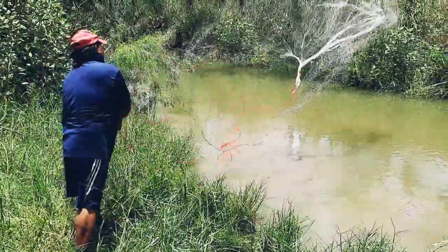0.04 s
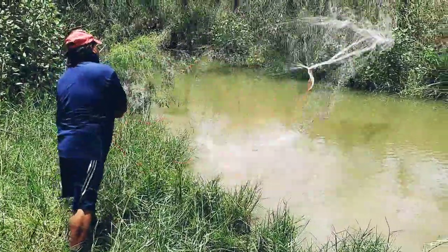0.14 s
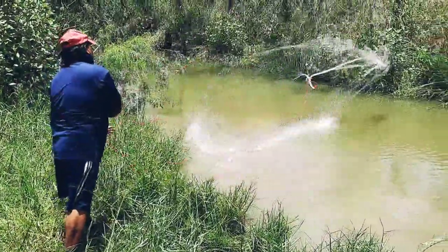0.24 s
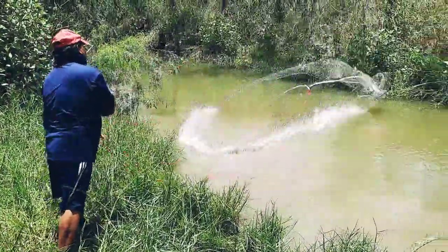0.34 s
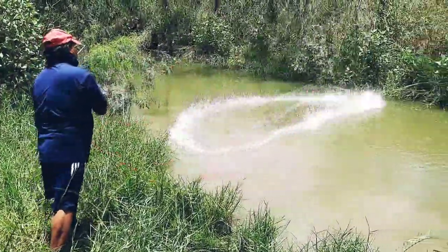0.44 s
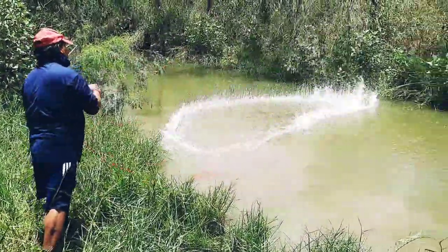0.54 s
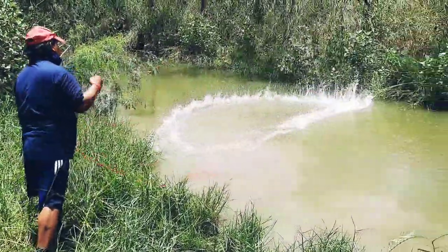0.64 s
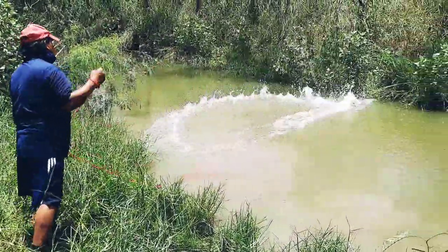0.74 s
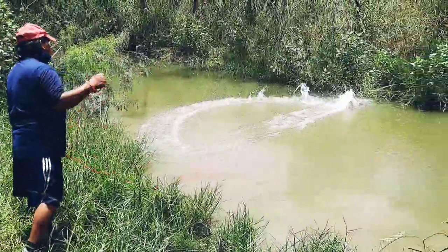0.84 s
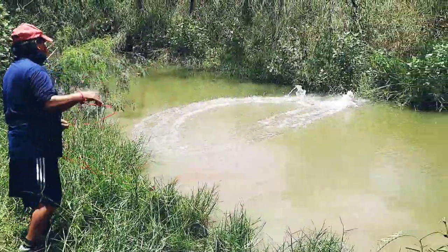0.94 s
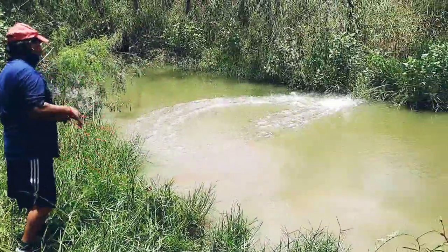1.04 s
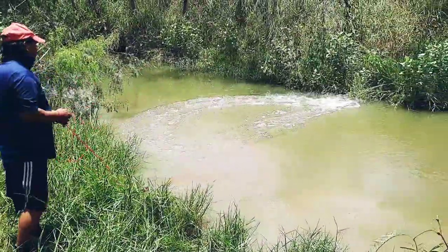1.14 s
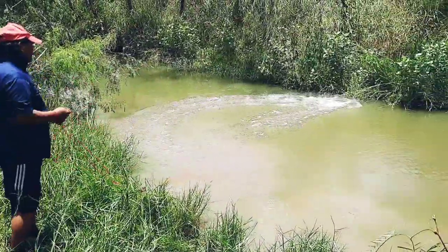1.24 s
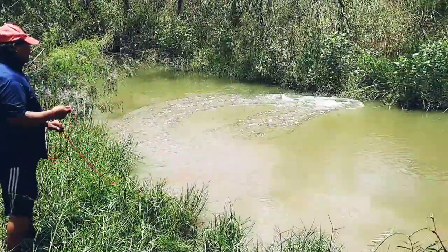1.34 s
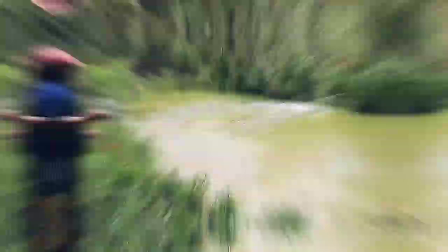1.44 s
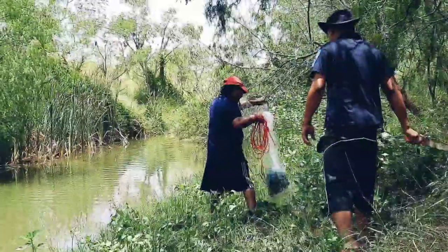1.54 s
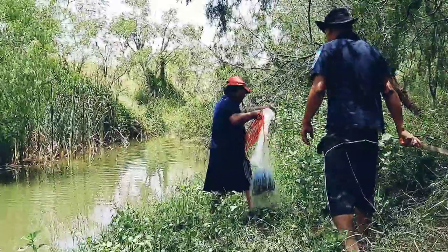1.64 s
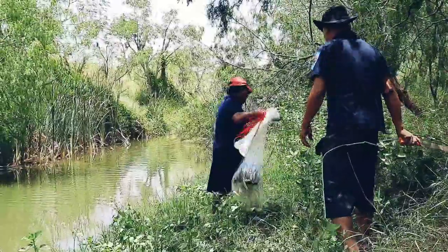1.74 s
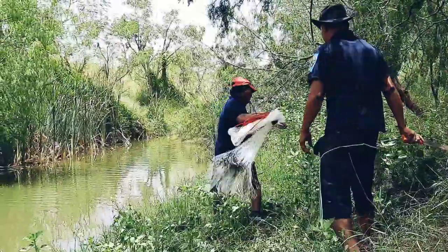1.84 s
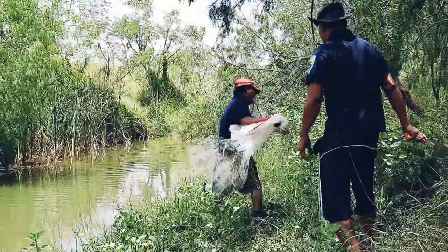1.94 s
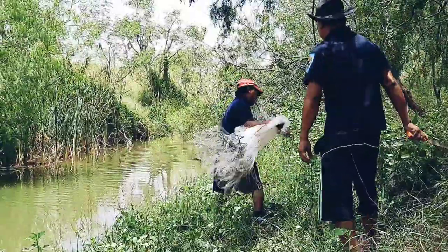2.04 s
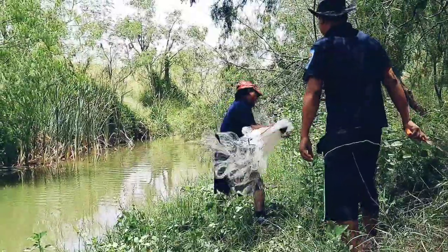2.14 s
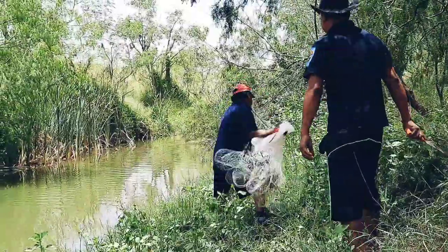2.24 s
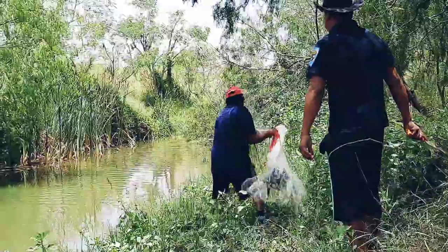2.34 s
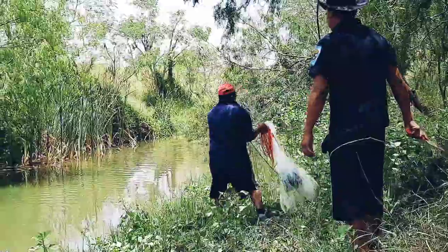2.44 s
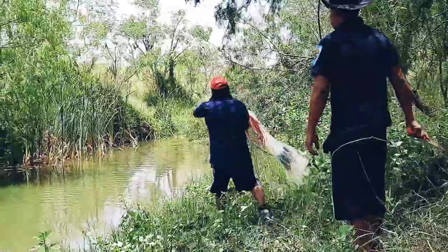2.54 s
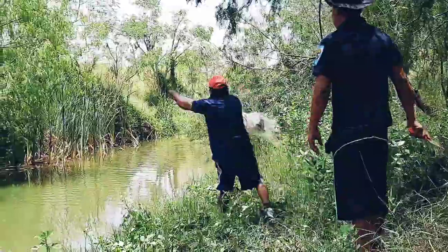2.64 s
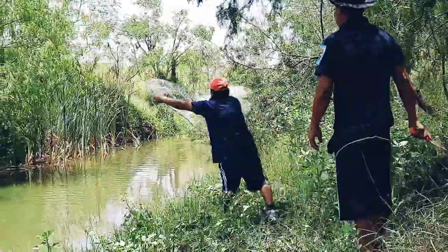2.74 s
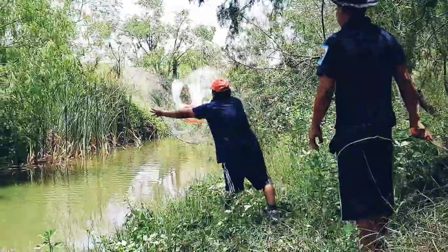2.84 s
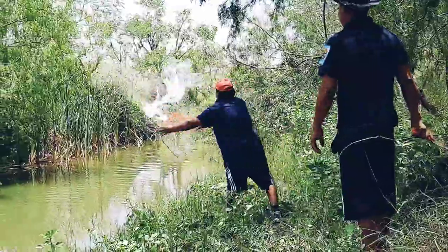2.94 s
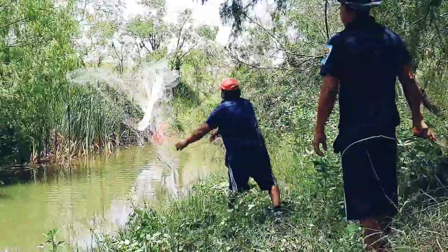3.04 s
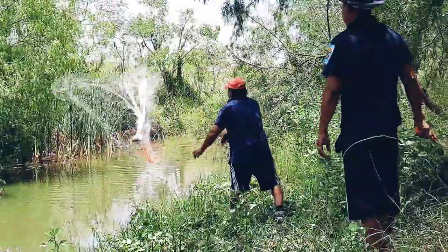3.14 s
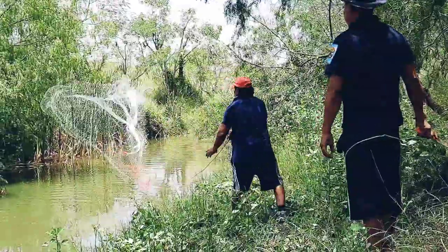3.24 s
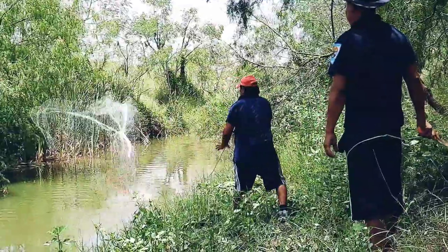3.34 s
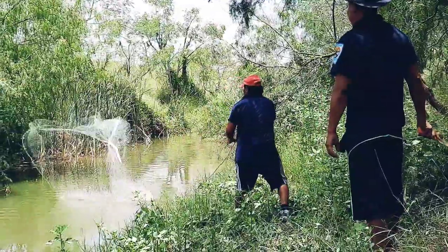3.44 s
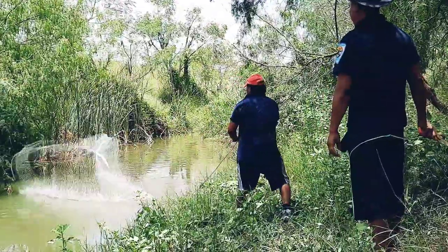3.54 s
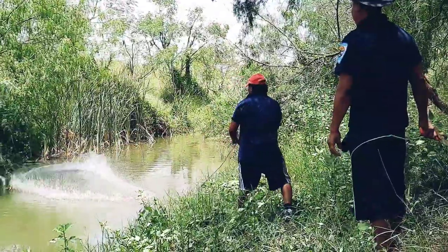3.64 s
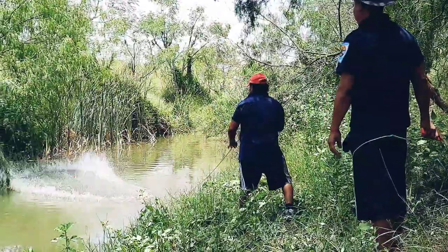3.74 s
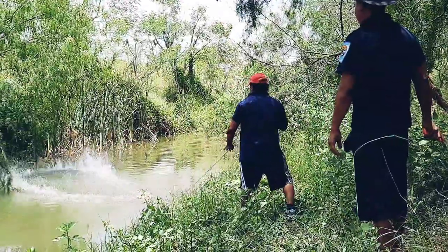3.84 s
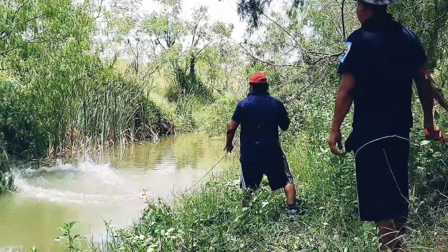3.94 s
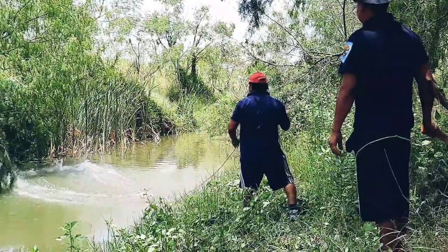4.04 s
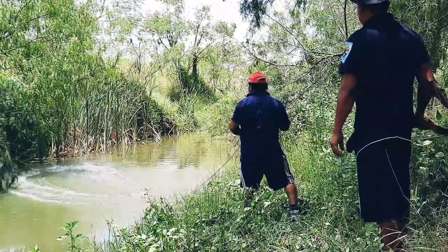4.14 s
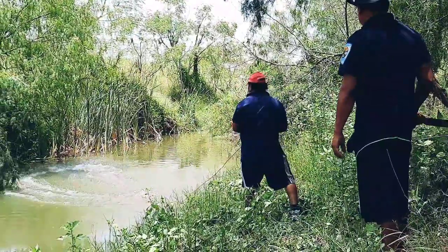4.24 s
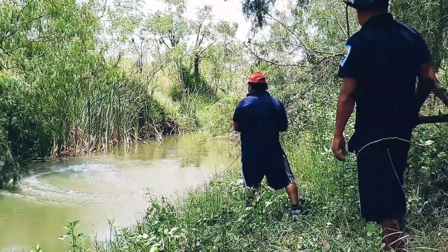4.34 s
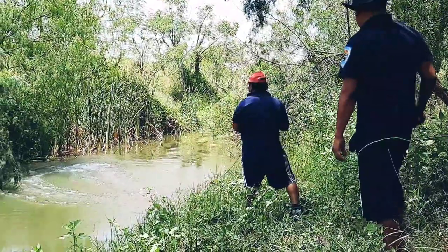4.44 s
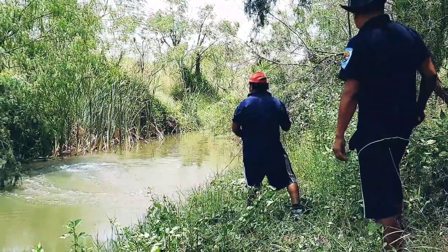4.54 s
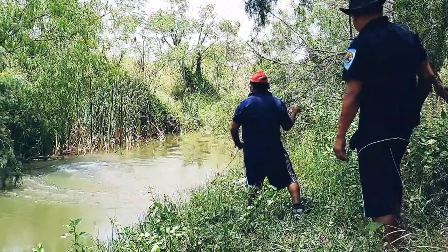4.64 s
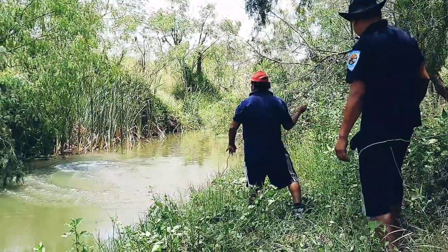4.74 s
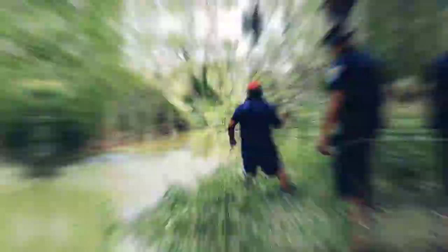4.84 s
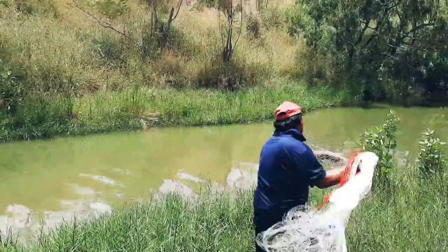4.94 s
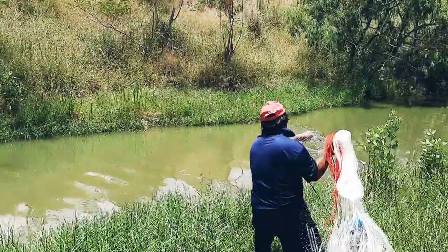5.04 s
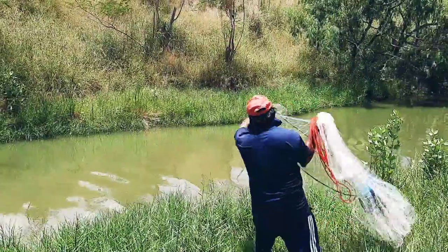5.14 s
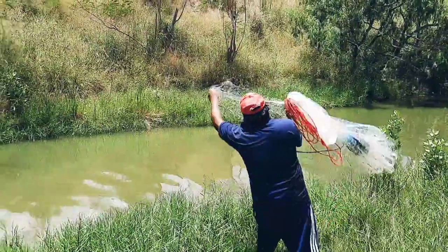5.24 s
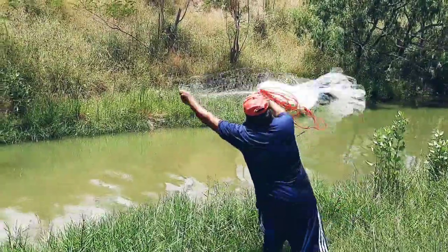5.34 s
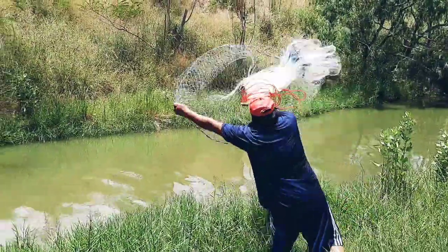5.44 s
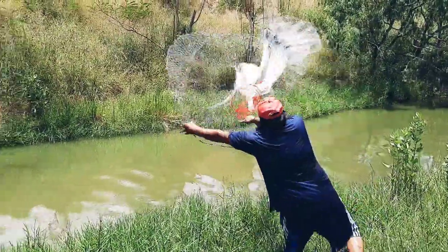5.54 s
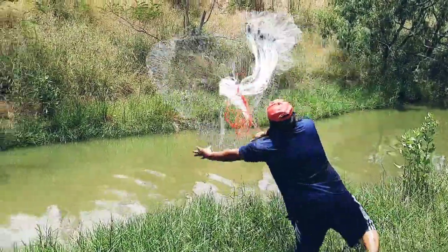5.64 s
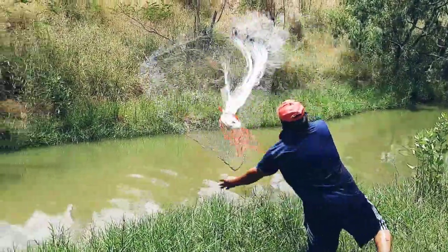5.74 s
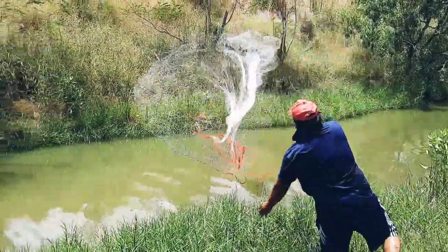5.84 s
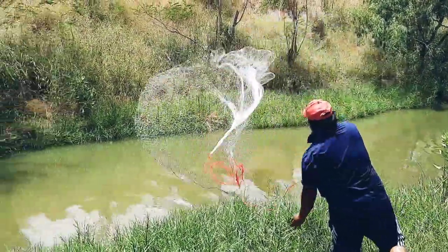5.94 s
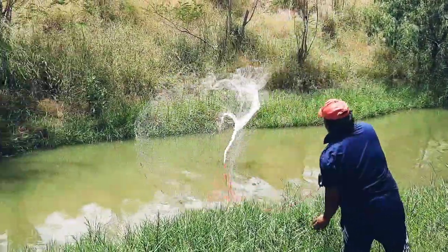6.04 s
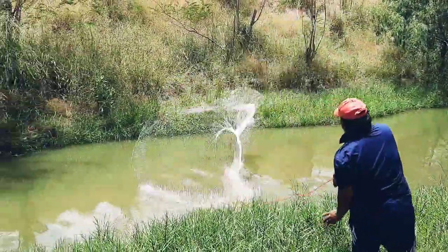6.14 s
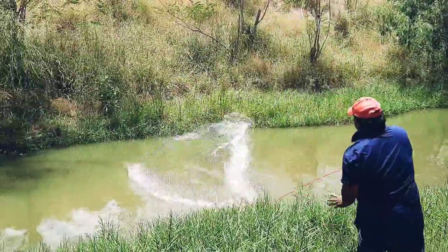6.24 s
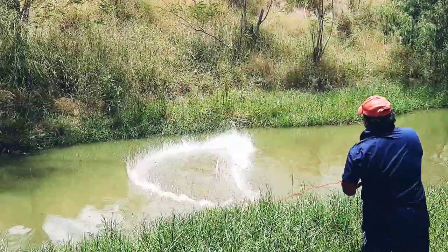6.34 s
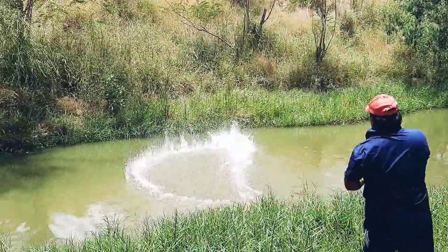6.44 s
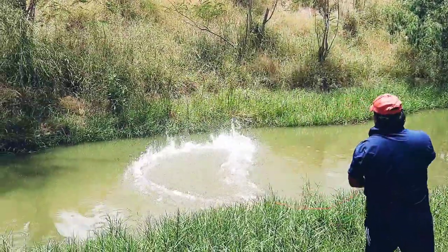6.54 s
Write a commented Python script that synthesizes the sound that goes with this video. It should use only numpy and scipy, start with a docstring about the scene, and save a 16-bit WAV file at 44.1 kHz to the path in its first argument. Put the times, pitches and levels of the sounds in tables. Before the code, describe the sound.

Three separate splashes of a thrown net, heard in stereo from the bank. Each begins with a tiny tick and quick patter of sinkers, bursts into slaps and gulping bubbles, then thins to falling spray. Between them come dry mesh rustles, light clinks and soft knocks. The open air is quiet, with a faint cicada early, a very high cricket late, and two short dips in level.

```python
"""A weighted cast net is thrown three times into a canal, heard from the grassy bank.
Each splash sums clouds of damped tones: gulping air pockets, ringing bubbles, fizz and falling spray.
Single sinkers tick, and clumps of them slap the surface and excite short-lived cavities.
The mesh rustles and whooshes as shaped noise, and sinkers clink as sums of decaying modes.
Insects are pulsed high resonances, a breeze is steady noise, and the level dips briefly between throws."""
import sys
import numpy as np
from scipy import signal
from scipy.fft import rfft, irfft, next_fast_len
from scipy.io import wavfile
from scipy.ndimage import map_coordinates

SR = 44100
rng = np.random.default_rng(int(sys.argv[2]) if len(sys.argv) > 2 else 0)


def to_wav(s):
    """Save 16-bit WAV."""
    ch = np.atleast_2d(s).T  # columns
    pcm = np.round(np.clip(ch, -1, 1) * 32767)  # PCM
    wavfile.write(sys.argv[1], SR, pcm.astype(np.int16))


N = 290178  # length in samples

# Spectra shared by splashes, plunges and touches. Each row: frequency in Hz, relative level in dB.
# Large pockets of air dragged under
POCKET_SPECTRUM = [(40, -38), (110, -14), (165, -7.5), (220, -2.5), (315, 6), (420, -3.5), (600, -22),
                   (1500, -66)]
# Ringing bubbles
BUBBLE_SPECTRUM = [(150, -50.5), (410, -11), (510, -4), (620, -3), (740, -0.5), (900, -1.5), (1060, -6),
                   (1400, -9.5), (1750, -15), (2200, -28), (5000, -70)]
# Small bubbles, pitched between the ringing bubbles and the spray
FIZZ_SPECTRUM = [(400, -46), (850, -16.5), (1200, 0.5), (1500, -2.5), (1780, -2.5), (2100, -6), (3200, -22),
                 (7000, -56.5)]
# Droplets and falling spray
SPRAY_SPECTRUM = [(150, -45), (500, -24), (800, -9.5), (1300, -0.5), (1750, -3), (2050, -2), (2600, -1.5),
                  (3200, -2), (4000, -3.5), (5500, -4.5), (7500, -5.5), (9000, -16.5), (10500, -13.5),
                  (13000, -8), (16000, -12)]
# Brief dips of the level. Each entry: centre in seconds.
DIP_TIMES = [1.479, 4.872]


def amp(db):
    """Level law: decibels to amplitude gain."""
    return np.exp(np.asarray(db) * (np.log(10) / 20))


def unit(x):
    """Power normalisation: x at rms 1."""
    return x / np.sqrt(np.mean(x ** 2) + 1e-20)


def along(points, hz):
    """Spectral interpolation: (Hz, value) points read on a logarithmic frequency axis."""
    f, v = np.transpose(points)
    return np.interp(np.log(hz + 1), np.log(f + 1), v)


def wobble(rate):
    """Slow random modulation: a smooth curve through `rate` random knots a second."""
    knots = rng.standard_normal(int(N * rate / SR) + 4)
    return map_coordinates(knots, [np.arange(N) * rate / SR])


def filtered(x, response):
    """Linear filtering: the spectrum of x is multiplied by a response of frequency."""
    m = next_fast_len(N + 8192)  # padding keeps the tail from wrapping round
    return irfft(rfft(x, m) * response(np.fft.rfftfreq(m, 1 / SR)), m)[..., :N]


def add(track, s, sound):
    """Superposition: a sound is mixed into a track, in place, at time s."""
    part = track[..., max(0, round(s * SR)):][..., :sound.shape[-1]]
    part += sound[..., :part.shape[-1]]


def spread(pair, spectrum):
    """Partial coherence: unrelated signals become mid and side, coloured, with a mid of rms 1."""
    # Likeness of left and right. Each row: frequency in Hz, correlation from 0 to 1.
    likeness = [(60, 0.4), (200, 0.75), (700, 0.9), (1400, 0.16), (3000, 0.08), (7000, 0), (15000, 0)]

    def mid_side(hz):
        turn = np.arccos(np.clip(along(likeness, hz), -1, 1)) / 2
        return amp(along(spectrum, hz)) * np.array([np.cos(turn), np.sin(turn)])

    mid, side = filtered(pair, mid_side)
    return np.array([mid + side, mid - side]) / np.std(mid)


def grains(rate, lo_hz, hi_hz, cycles, scatter_db, rise, size):
    """Random superposition of damped, rising tones, each dying in a few cycles, at rms 1."""
    u = rng.random((int(rate * N / SR), 4))
    hz = lo_hz + (hi_hz - lo_hz) * u[:, 0]
    strength = np.sqrt(hz) * amp(-scatter_db * np.log(np.maximum(u[:, 1], .02)))
    life = np.float32(cycles * (.5 + u[:, 2:3]))  # cycles to decay by a factor e
    turns = np.outer(np.float32(hz / SR), np.arange(size, dtype=np.float32))
    age = turns / life
    rising_turns = turns * (1 + np.float32(rise) * np.minimum(age, 2))
    tones = np.exp(-age) * np.sin(2 * np.pi * rising_turns)
    where = (u[:, 3:] * N).astype(int) + np.arange(size)
    track = np.bincount(where.ravel(), (strength[:, None] * tones).ravel(), N)[:N]
    return unit(track - track.mean())


def cloud(spectrum, wash_db, **grain):
    """Dense-event limit: stereo grains over a noise wash of countless smaller ones."""
    pair = np.array([grains(**grain), grains(**grain)])
    return spread(pair + amp(wash_db) * rng.standard_normal((2, N)), spectrum)


def held(start, end, attack, release_db_per_s, growth_db_per_s=0):
    """Exponential growth and decay: gain rises at start, grows to 1 at end, then dies away."""
    t = np.arange(N) / SR
    growth = growth_db_per_s * np.clip(t - end, start - end, 0)
    release = release_db_per_s * np.maximum(t - end, 0)
    return np.clip((t - start) / attack, 0, 1) * amp(growth - release)


def together(gains):
    """Incoherent addition: the gains of unrelated sounds add in power."""
    return np.sqrt(sum(gain ** 2 for gain in gains))


def swells(rows):
    """Gaussian envelopes, added in power, from rows of centre s, half width s and level dB."""
    t = np.arange(N) / SR
    return together(amp(db) * np.exp(-.5 * np.minimum(np.abs(t - s) / width, 10) ** 2)
                    for s, width, db in rows)


def strokes(rows, attack, release_db_per_s):
    """Held envelopes with exponential release, from rows of start s, length s and level dB."""
    return together(amp(db) * held(s, s + length, attack, release_db_per_s) for s, length, db in rows)


def air():
    """Turbulence as shaped noise: a faint breeze in the reeds and a little rumble on the microphone."""
    # Breeze in the reeds. Each row: frequency in Hz, relative level in dB.
    reed_spectrum = [(25, -34), (60, -12.5), (120, -9.5), (200, -20), (310, -6.5), (460, -17), (820, -17),
                     (1700, -22), (3200, -30), (6900, -22.5), (9500, -26), (16000, -15.5)]
    # Wind brushing the microphone. Each row: centre in seconds, half width in seconds, level in dB.
    gusts = [(.15, .45, -66.5), (3.7, 0.18, -71), (4.4, 0.2, -70.5), (6.4, 0.19, -66.5)]
    breeze_db = -83  # rumble between gusts
    reeds = spread(rng.standard_normal((2, N)), reed_spectrum) * amp(-66.5 + 1.2 * wobble(3))
    rumble_spectrum = [(20, -26.5), (50, -3), (120, -3.0), (200, -19.5), (800, -69)]
    rumble = spread(rng.standard_normal((2, N)), rumble_spectrum)
    return reeds + rumble * together([swells(gusts), amp(breeze_db)])


def buzz(spectrum, pulse_hz, duty, depth):
    """Pulsed excitation: a high resonance driven in rapid, slightly unsteady bursts."""
    phase = np.cumsum(pulse_hz * (1 + .008 * wobble(4.2))) / SR % 1
    bursts = 1 + depth * (phase < duty)
    return spread(bursts * rng.standard_normal((2, N)), spectrum)


def insects():
    """Amplitude-modulated resonances: a cicada until the first dip, a bush cricket from the second."""
    # Cicada resonances. Each row: frequency in Hz, relative level in dB.
    cicada_spectrum = [(3000, -27), (7800, -21), (8500, -12), (9100, -19), (9900, -5), (10250, -8),
                       (10750, -3), (11000, -5.5), (11350, 0), (11750, -6.5), (12020, -3.5), (12600, -9.5),
                       (13400, -9), (16000, -17.5)]
    # Bush cricket resonances. Each row: frequency in Hz, relative level in dB.
    cricket_spectrum = [(5000, -44.5), (10000, -31), (12500, -24.5), (14000, -12), (14900, -5.5),
                        (15500, -3), (16000, -4.5)]
    cicada_db, cricket_db = -48.5, -45.5  # before the stereo balance
    fade_s = .02
    t = np.arange(N) / SR
    cicada = buzz(cicada_spectrum, pulse_hz=182, duty=0.1, depth=0.67) * amp(cicada_db)
    cicada *= np.clip((DIP_TIMES[0] - t) / fade_s, 0, 1)
    cricket = buzz(cricket_spectrum, pulse_hz=41, duty=.5, depth=0.64) * amp(cricket_db)
    cricket *= np.clip((t - DIP_TIMES[1]) / fade_s, 0, 1)
    return cicada * amp([[2], [-2]]) + cricket * amp([[-1.5], [1.5]])


def net():
    """Friction noise and modal ringing: mesh rustles and whooshes, sinkers clink, soft knocks sound."""
    # Mesh and grass rustling. Each row: frequency in Hz, relative level in dB.
    rustle_spectrum = [(300, -34), (1500, -13), (2800, -4.5), (4500, -2), (7600, 2.5), (9300, -12.5),
                       (11000, -3), (13000, 4), (16000, -1.5)]
    # Gathering, swinging and paying out. Each row: start in seconds, length in seconds,
    # level in dB before the stereo balance.
    handling = [(1.52, .12, -60.5), (1.68, .17, -64), (1.94, .06, -69.5), (2.01, 0.037, -61),
                (2.125, 0.018, -64), (2.2, .09, -68), (2.435, .06, -58.5), (2.56, .07, -69.5),
                (2.71, .06, -65.5), (2.85, 0.14, -65.5), (3.09, .02, -76), (4.5, 0.39, -71),
                (4.9, 0.22, -63.5), (5.09, .15, -59), (5.3, 0.38, -63), (5.67, .09, -60), (5.83, .23, -65)]
    # Mesh sweeping through the air. Each row: frequency in Hz, relative level in dB.
    whoosh_spectrum = [(300, -23), (800, -15.5), (1250, 2), (1650, 2), (2300, -5), (4000, -26), (9000, -46)]
    # Sweeps of the mesh. Each row: start in seconds, length in seconds, level in dB.
    flights = [(-.1, .2, -69), (3.17, 0.12, -74.5), (5.18, .12, -69), (5.45, .2, -75), (5.87, .2, -72)]
    # Modes of a sinker. Each row: frequency in Hz, mean level in dB, time to decay by 60 dB in seconds.
    sinker_modes = [(2572, -9, 0.079), (3290, -20, 0.14), (4130, -10, 0.14), (4480, -10, .16),
                    (5100, -10, 0.16), (6580, -3, 0.044), (7370, -11, 0.11), (12200, -8.5, .05),
                    (13650, 0, .14)]
    # Sinkers clicking together. Each row: time in seconds, level in dB before trims.
    clinks = [(1.5299, -39), (1.7599, -48), (1.8083, -47), (2.0193, -42), (2.0295, -35), (2.0365, -40),
              (2.135, -45.5), (5.869, -48)]
    # Soft knocks of the gear, and at 3.328 s the net first touching the water.
    # Each row: time in seconds, level in dB before a trim, frequency in Hz.
    knocks = [(1.527, -45, 2620), (1.554, -52, 2470), (2.245, -59, 780), (3.073, -53, 767),
              (3.221, -56, 825), (3.328, -46.5, 1370), (4.735, -58, 720), (5.255, -53, 700),
              (5.279, -53, 807), (5.802, -51, 413)]

    rustle = cloud(rustle_spectrum, wash_db=6.5, rate=1500, lo_hz=2000, hi_hz=15100,
                   cycles=2.8, scatter_db=4, rise=0, size=100)
    out = rustle * strokes(handling, attack=.042, release_db_per_s=99.5)
    out *= amp([[2.8], [4]])  # the thrower stands a little to the right
    whoosh = spread(rng.standard_normal((2, N)), whoosh_spectrum)
    out += whoosh * strokes(flights, attack=0.051, release_db_per_s=50.5)

    t = np.arange(SR // 6) / SR
    scrapes = np.zeros((2, N))
    for s, db in clinks:
        ring = np.zeros((2, len(t)))
        for hz, mode_db, t60 in sinker_modes:
            level_db = mode_db + rng.normal(0, 1.8, (2, 1))  # each strike excites the modes unevenly
            ring += amp(level_db - 60 * t / t60) * np.sin(2 * np.pi * hz * t)
        add(out, s, amp(db - 4.5) * ring / np.abs(ring).max())
        scrape = np.exp(-t / 0.0064) * rng.standard_normal((2, len(t)))
        add(scrapes, s, amp(db - 5.0) * scrape)
    for s, db, hz in knocks:
        # a rough contact excites one damped mode
        contact = np.exp(-t / 0.011) * rng.standard_normal(len(t))
        mode = np.exp(-t / 0.0027) * np.sin(2 * np.pi * hz * t)
        knock = signal.fftconvolve(contact, mode)
        add(out, s, amp(db - 1.5) * knock / np.abs(knock).max())
    return out + filtered(scrapes, lambda hz: amp(along(rustle_spectrum, hz)))


def touches():
    """Impulsive contact: a lone sinker meets the surface with a tiny, sharp tick of decaying noise."""
    # First single sinker of each throw. Each row: time in seconds, level in dB before a trim and the filter.
    contacts = [(0.0965, -25.5), (3.3405, -38), (6.0803, -26.5)]
    t = np.arange(SR // 50) / SR
    ticks = np.zeros((2, N))
    for s, db in contacts:
        add(ticks, s, amp(db + 3.5) * np.exp(-t / 0.0012) * rng.standard_normal((2, len(t))))
    return filtered(ticks, lambda hz: amp(along(SPRAY_SPECTRUM, hz)))


def plunges():
    """Cavity resonance: a clump slaps the surface, and its cavity rings for a few cycles, rising."""
    # Clumps of sinkers or falling water. Each row: time in seconds, level in dB before trims and filters,
    # initial cavity frequency in Hz, slap in dB relative to that level before its trim.
    clumps = [(0.131, -35, 1890, 4.5), (0.184, -19.5, 730, -2.5), (0.206, -25.5, 830, 0.5),
              (0.235, -16, 836, -14), (0.248, -22.5, 238, -12.5), (0.26, -22.5, 215, -7.5),
              (0.35, -21.5, 800, -12.5), (0.4325, -13.5, 704, -11), (0.437, -16.5, 750, -12),
              (0.468, -20, 710, -8.5), (0.5056, -15, 807, -10.5), (0.532, -22.5, 298, -7.5),
              (0.544, -17.5, 637, -7.5), (0.564, -20, 349, -10.5), (0.57, -19, 324, -9),
              (1.18, -34.5, 795, -1), (1.2, -34.5, 1430, -5.5), (1.37, -44.5, 850, -7.5),
              (3.36, -41.5, 990, 1.5), (3.457, -21, 1430, -0.5), (3.507, -28, 710, -6),
              (3.539, -24.5, 750, -2), (3.551, -21, 1040, -20.5), (3.57, -19, 794, -10.5),
              (3.609, -23, 970, -11), (3.774, -15.5, 518, -17.5), (3.785, -17, 637, -14.5),
              (3.797, -26, 502, -11), (3.995, -34, 690, -4), (6.162, -22, 748, -5),
              (6.187, -18.5, 638, -11), (6.254, -22.5, 875, -9.5), (6.318, -23.5, 840, -5.5),
              (6.347, -22, 786, 2), (6.373, -14.5, 860, -10), (6.397, -16, 730, -13.5)]
    t = np.arange(SR // 12) / SR
    swell = 1 - np.exp(-t / 0.00059)
    cavities, churn, slaps = np.zeros(N), np.zeros(N), np.zeros((2, N))
    for s, db, hz, slap_db in clumps:
        ring = np.sin(2 * np.pi * hz * t * (1 + 3 * t)) * np.exp(-t * hz / 2.77)
        churn_noise = np.exp(-t / .004) * rng.standard_normal(len(t))
        slap_noise = np.exp(-t / 0.0052) * rng.standard_normal((2, len(t)))
        add(cavities, s, amp(db - 0.5) * swell * ring)
        add(churn, s, amp(db + 1.5) * swell * churn_noise)
        add(slaps, s, amp(db + slap_db - 2) * swell * slap_noise)
    body = filtered(churn, lambda hz: amp(along(BUBBLE_SPECTRUM, hz)) + amp(along(POCKET_SPECTRUM, hz) - 5.5))
    body += filtered(cavities, lambda hz: hz ** 4 / (hz ** 4 + 170 ** 4))  # the surface radiates no deep bass
    return body + filtered(slaps, lambda hz: amp(along(SPRAY_SPECTRUM, hz)) + amp(along(FIZZ_SPECTRUM, hz) - 1.5))


def throw(contact, lands, sunk, fallen, patter_db, rim_db, fall_db, pocket_db, calming_db_per_s):
    """Staged energy input: gains of pockets, bubbles and spray as sinkers patter, rim lands, spray falls."""
    # relative levels in dB of air pockets, bubbles, spray
    patter_mix, rim_mix, fall_mix = (-33, -6, 0), (-4, 1.8, -5), (-14.5, 0, -1.2)
    # The patter deepens as heavier sinkers arrive. Growth in dB per second of air pockets, bubbles, spray.
    patter_growth = (150, 116, 35)
    patter_attack_s, rim_attack_s, fall_attack_s = .014, 0.005, .03
    rim_growth, fall_growth, release = 4, 2, 349  # dB per s
    calming_pace = (1.4, 1, 1)  # large air pockets are gone sooner than bubbles and spray

    patter = [amp(patter_db + db) * held(contact - patter_attack_s, lands, patter_attack_s, release, growth)
              for db, growth in zip(patter_mix, patter_growth)]
    rim_gain = amp(rim_db) * held(lands, sunk, rim_attack_s, release, rim_growth)
    rim = np.outer(amp(rim_mix), rim_gain)
    fall = [amp(fall_db + db) * held(sunk, fallen, fall_attack_s, pace * calming_db_per_s, fall_growth)
            for db, pace in zip(fall_mix, calming_pace)]
    pockets, bubbles, spray = together(np.array([patter, rim, fall]))
    return np.array([pockets * amp(pocket_db), bubbles, spray])


def splashes():
    """Bubble acoustics: pockets gulp, bubbles ring and droplets crackle, surging most as the rim lands."""
    # Throws. Each row: first contact, rim lands, rim sunk, spray fallen, all in seconds; patter, rim and
    # falling spray in dB before the mix; air pockets in relative dB; calming in dB per second, at pace 1.
    throws = [(.112, 0.179, 0.64, .9, -45.5, -35.5, -43.5, 1.5, 44),
              (3.346, 3.45, 3.806, 4.211, -48.5, -40.5, -47.5, -2, 59),
              (6.083, 6.155, 6.455, 6.8, -43, -35.5, -42.5, 0, 50)]
    # Large pockets of air dragged under or welling up. Each row: centre in seconds, half width in
    # seconds, level in dB before the mix.
    gulps = [(.255, .016, -27.5), (.572, 0.011, -30), (.87, .04, -53.5), (3.72, .03, -45),
             (3.797, 0.019, -34), (4.3, .07, -59), (6.218, 0.0072, -35), (6.44, 0.021, -34.5)]
    # Sheets of spray from mesh or water hitting the surface. Each row: centre in seconds, half width
    # in seconds, level in dB before the mix.
    lashes = [(.138, .018, -42.5), (.21, 0.034, -39), (.48, 0.053, -38.5), (.565, 0.016, -40),
              (.905, .028, -44), (1.07, 0.066, -53.5), (1.185, .016, -49), (3.362, 0.011, -46.5),
              (3.463, 0.011, -42), (3.53, .02, -44.5), (3.688, .024, -37.5), (6.125, .015, -41.5),
              (6.175, 0.025, -42), (6.36, 0.014, -33.5)]

    pocket_gain, bubble_gain, spray_gain = together(throw(*row) for row in throws)
    pocket_gain = together([pocket_gain, swells(gulps)])
    spray_gain = together([spray_gain, swells(lashes)])
    fizz_gain = np.sqrt(bubble_gain * spray_gain)  # small bubbles lie between spray and large bubbles
    landing = pocket_gain / (pocket_gain + .4 * spray_gain + 1e-9)  # near 1 while sinkers drag air under
    surge = wobble(55) * (.25 + landing)

    pockets = cloud(POCKET_SPECTRUM, wash_db=0.0, rate=220, lo_hz=151.0, hi_hz=522,
                    cycles=2.5, scatter_db=1.6, rise=.04, size=1500)
    bubbles = cloud(BUBBLE_SPECTRUM, wash_db=-0.5, rate=700, lo_hz=426.0, hi_hz=1485,
                    cycles=4, scatter_db=1.5, rise=0.033, size=900)
    fizz = cloud(FIZZ_SPECTRUM, wash_db=-4.0, rate=600, lo_hz=942, hi_hz=3008,
                 cycles=7.4, scatter_db=2.5, rise=.02, size=800)
    spray = cloud(SPRAY_SPECTRUM, wash_db=2, rate=3500, lo_hz=1493, hi_hz=14950,
                  cycles=5.0, scatter_db=3.0, rise=.02, size=180)
    return (pockets * pocket_gain * amp(-2.5 + 0.98 * surge)
            + bubbles * bubble_gain * amp(0.5 - 1.9 * landing + 1.2 * surge)
            + fizz * fizz_gain * amp(-6.5 + 1.4 * landing + 0.92 * surge)
            + spray * spray_gain * amp(1.1 + 1.0 * surge))


def scene():
    """Superposition with early reflections: all sources, lows leaning left and highs leaning right."""
    # Surfaces close to the microphone. Each row: left delay in seconds, right delay in seconds, gain.
    reflections = [(.00118, 0.0011, 0.073), (.0043, 0.0046, 0.13), (.0089, 0.0058, 0.19)]
    # Stereo balance. Each row: frequency in Hz, left minus right in dB.
    balance = [(60, 9), (200, 2), (700, 4), (1300, 2.5), (2400, 2.5), (4400, -4.5), (8000, -2.5),
               (15000, -4)]
    mix = air() + insects() + net() + touches() + plunges() + splashes()

    def response(hz):
        echoes = 1
        for left, right, gain in reflections:
            echoes = echoes + gain * np.exp(-2j * np.pi * hz * np.array([[left], [right]]))
        lean_db = along(balance, hz)
        return echoes * amp(np.array([lean_db, -lean_db]) / 2)

    return filtered(mix, response)


def record(dry):
    """Gain and band limiting: the level dips briefly between throws, and nothing passes above top_hz."""
    half_dip_s, top_hz = 0.11, 15850
    t = np.arange(N) / SR
    fade = np.prod([np.clip(np.abs(t - s) / half_dip_s, .05, 1) for s in DIP_TIMES], axis=0)
    return filtered(dry * fade, lambda hz: hz < top_hz)


dry = scene()
out = record(dry)
to_wav(out)
```